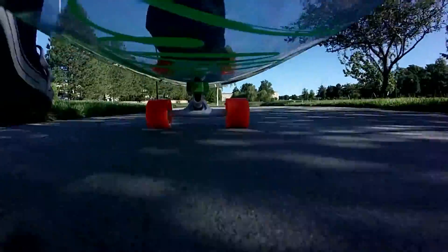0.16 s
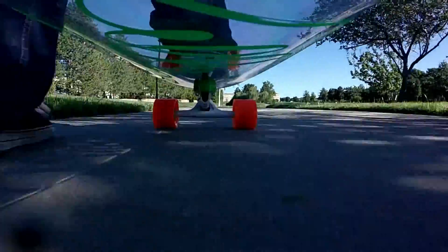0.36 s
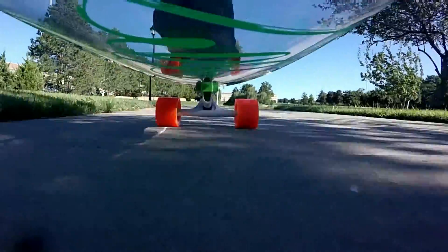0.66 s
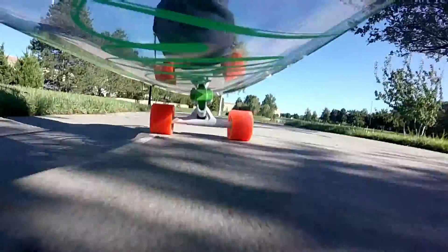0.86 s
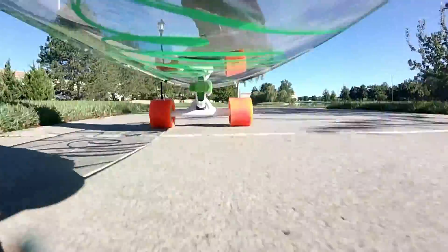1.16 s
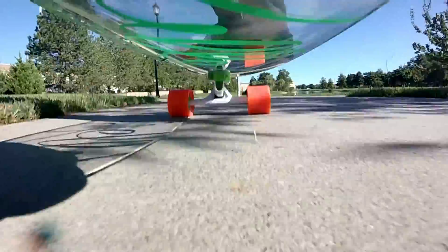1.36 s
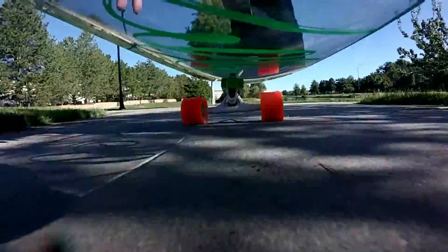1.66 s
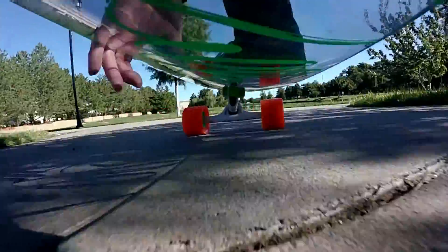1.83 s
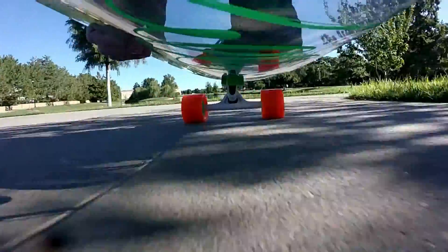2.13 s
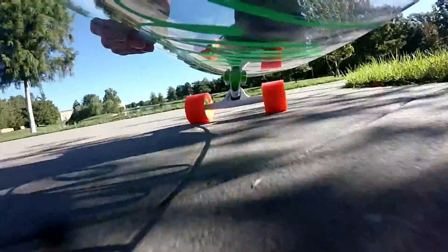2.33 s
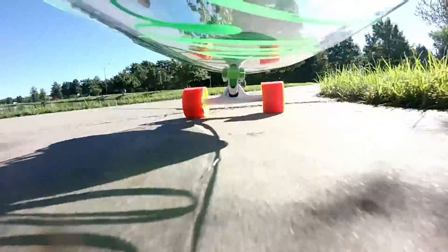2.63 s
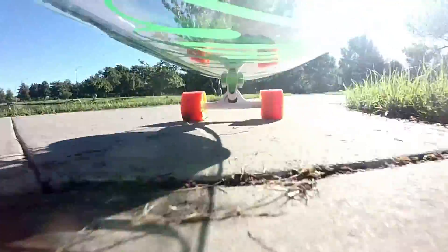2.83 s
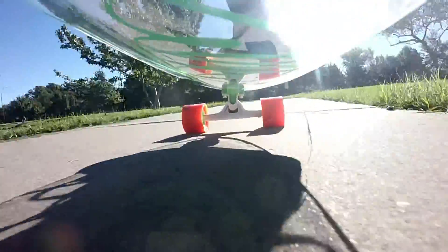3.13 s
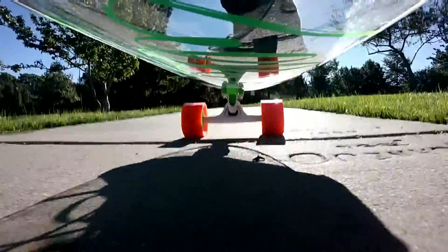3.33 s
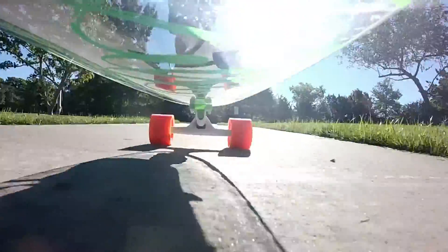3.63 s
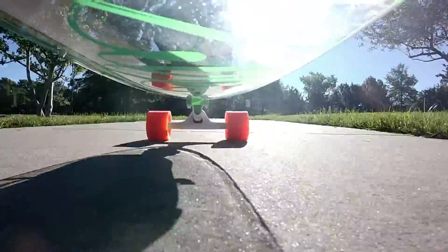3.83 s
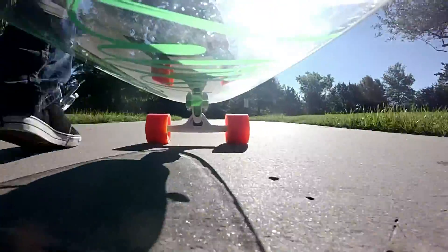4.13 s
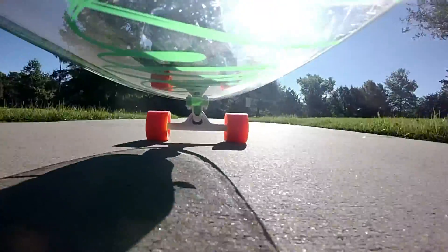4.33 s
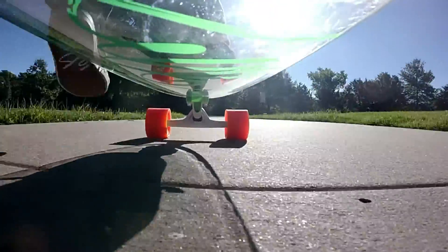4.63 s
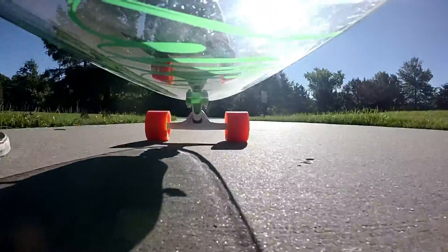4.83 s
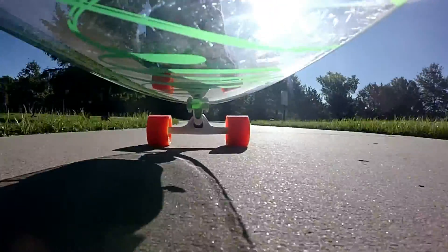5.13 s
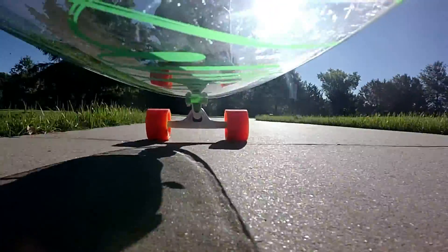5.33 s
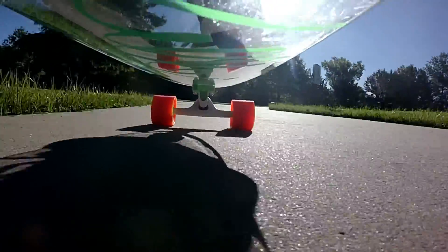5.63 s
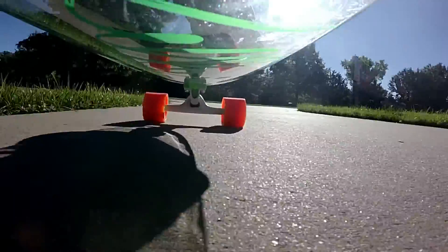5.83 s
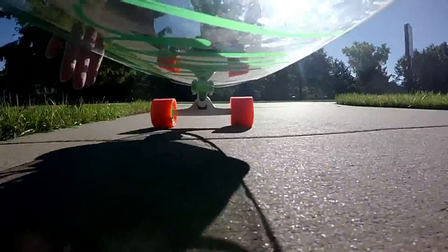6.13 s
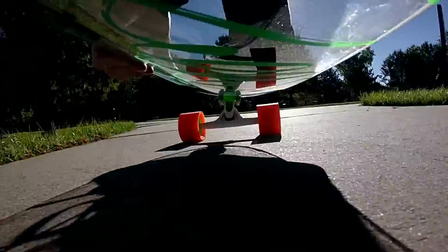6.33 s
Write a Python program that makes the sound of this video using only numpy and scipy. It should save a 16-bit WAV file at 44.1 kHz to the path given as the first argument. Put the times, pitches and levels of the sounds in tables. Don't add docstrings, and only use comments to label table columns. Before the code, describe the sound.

A close, dry, single-channel microphone hangs under a skateboard deck in open air. It begins straight on a joint with a hard bang, then steady rumbling and fine grit hiss continue. Pairs of hard clacks return about every half second, front axle then rear, while loose plastic ticks and rattles rapidly around them. Tiny rubber squeaks come near one second and past the middle; more knocks arrive just before the end.

```python
import sys
import numpy as np
from scipy import signal
from scipy.fft import rfft, irfft, next_fast_len
from scipy.io import wavfile
from scipy.ndimage import map_coordinates

SR = 44100
rng = np.random.default_rng(int(sys.argv[2]) if len(sys.argv) > 2 else 0)


def linear_from_db(decibels):
    return 10 ** (np.asarray(decibels, float) / 20)


def wrap_up_sound(samples):
    columns = np.atleast_2d(samples).T
    tamed = np.clip(columns, -1, 1)
    steps = np.round(tamed * 32767).astype(np.int16)
    wavfile.write(sys.argv[1], SR, steps)


N = 285327


def unit(x):
    return x / np.sqrt(np.mean(x ** 2) + 1e-20)


def curves(rows):
    s, *columns = np.transpose(rows)
    return [np.interp(np.arange(N) / SR, s, column) for column in columns]


def wobble(rate):
    knots = rng.standard_normal(int(N * rate / SR) + 4)
    return map_coordinates(knots, [np.arange(N) * rate / SR])


def filtered(x, response):
    m = next_fast_len(N + SR // 2)
    return irfft(rfft(x, m) * response(np.fft.rfftfreq(m, 1 / SR)), m)[:N]


def colour(points):
    f, db = np.transpose(points)
    return lambda hz: linear_from_db(np.interp(np.log(hz + 1), np.log(f), db))


def resonance(f, centre, width, db):
    return linear_from_db(db) * 1j * f * width / (centre ** 2 - f * f + 1j * f * width)


def body(modes):
    return lambda f: sum((-1) ** k * resonance(f, *mode) for k, mode in enumerate(modes))


def place(times, sounds):
    at = np.round(times * SR).astype(int)[:, None] + np.arange(sounds.shape[1])
    return np.bincount(at.ravel(), sounds.ravel(), N + SR)[:N]


# (time [s], peak level [dB], ring frequency [Hz], brightness [dB])
FRONT_KNOCKS = [(0.0, -7.5, 2970, -8), (0.0024, 6.5, 3250, -25), (0.0094, 2, 1420, -9),
                (0.022, 0, 1520, -18), (0.6574, 5.5, 3970, -13), (0.6747, 2, 3000, -16.5),
                (1.2047, -6.5, 3170, -22), (1.7339, -5.5, 1620, -32), (1.7505, -4, 4030, -26),
                (1.7544, -5, 3000, -36), (2.7652, 4, 3060, -22), (2.783, 3, 3770, -16),
                (2.7991, -8.5, 1980, -21), (3.371, 7, 5130, -15), (3.3908, -1, 1453, -15),
                (3.4078, -4.5, 2750, -24), (4.026, -6, 2050, -44), (4.0374, -2, 2960, -34),
                (4.0441, 4, 3170, -13), (4.0522, -9, 1924, -32), (4.584, -4, 1860, -38),
                (4.594, -1.5, 2770, -2), (4.6013, -1, 2840, -31), (4.612, -1, 3000, -25),
                (5.006, 2.5, 2960, -17), (5.014, 2, 1580, -16), (5.0214, 1.5, 3020, -35),
                (5.7638, -2, 1800, -20.5), (5.7672, -4, 3020, -44), (5.7827, -6, 3300, -37)]
# (time [s], peak level [dB], ring frequency [Hz], brightness [dB])
REAR_KNOCKS = [(0.2536, -2.5, 5550, -17), (0.258, -2, 1350, -7), (0.2666, -1.5, 3120, -27),
               (0.2843, -5.5, 3850, -19), (0.289, 0, 1900, -34), (0.867, 2, 3380, -13.5),
               (0.8739, 0.5, 4020, -9.5), (0.879, -5, 1670, -22), (0.8932, -3, 3330, -32),
               (1.3835, -4, 1700, -12), (1.399, 0.5, 2730, -20), (1.934, 1, 3000, -18),
               (1.949, -2.5, 5300, -11), (1.9528, 1.5, 2720, -16), (1.9675, -2, 2820, -18),
               (2.4407, -1.5, 3000, -53), (2.4695, -3.5, 1620, -26), (2.962, -4, 1640, -7),
               (2.9681, 2, 1780, -23), (2.9767, -6, 3340, -11), (2.9831, -0.5, 1520, -10.5),
               (3.554, -8, 1410, -14), (3.5604, 6.5, 2040, -22.5), (4.2439, 2, 2780, -15),
               (4.2507, 0, 2850, -30), (4.7711, 0.5, 2900, -13), (4.779, -1.5, 3900, -11),
               (5.1677, 4, 2963, -31), (5.531, -0.5, 3520, -3.5), (5.9208, 3.5, 5300, -14)]
# (time [s], peak level [dB], brightness [dB])
MORE_KNOCKS = [(0.277, -5, -32), (0.47, -25.5, -9.5), (0.5806, -8, -49), (0.712, -9, -48),
               (0.8625, -9, -18), (0.8974, -7.5, -18), (0.911, -6.5, -28), (1.2429, -11.5, -34),
               (1.587, -11.5, -54), (2.9883, -10, -30), (3.0146, -11, -22), (3.3598, -10.5, -37),
               (3.388, -4.5, -19), (3.548, -8, -69), (4.0558, -4, -26), (4.1783, -22, -26),
               (4.2737, -10, -27), (4.7854, -5.5, -41), (5.029, -7.5, -42), (5.1764, -5.5, -18),
               (5.1828, -9.5, -36), (5.3635, -12, -12), (5.388, -8.5, -19), (5.3988, -8.5, -28),
               (5.435, -12.5, -43), (5.54, -9.5, -33), (5.9172, -5.5, -5), (6.1701, -3.5, -45),
               (6.31, -2, -18), (6.3144, 1.5, -8.5)]


def knocks():
    s, db, bright_db = np.transpose(MORE_KNOCKS)
    hz = 2900 * np.exp(0.15 * rng.standard_normal(len(s)))
    more = np.transpose([s, db, hz, bright_db])
    return np.concatenate([FRONT_KNOCKS, REAR_KNOCKS, more])


# (frequency [Hz], width [Hz], level [dB])
HOUSING_MODES = [(740, 186, 12), (1780, 305, 7), (3000, 2570, 3), (5550, 2250, -2), (8200, 400, -41)]


def mount_rattle():
    s, db, hz, bright_db = np.transpose(knocks())[:, :, None]
    start = s[:, 0]
    t = np.arange(SR // 40) / SR
    noise = rng.standard_normal((len(s), 3, len(t)))
    noise[:, :2, 0] = -2.5

    ring = np.sin(2 * np.pi * hz * t) * linear_from_db(-60 * t / 0.0067) * (1 - np.exp(-t / 0.00039))
    ring = place(start, linear_from_db(db - 1.0) * ring)

    buzz = place(start, linear_from_db(db + 0.2 * bright_db + 2) * noise[:, 0] * linear_from_db(-60 * t / 0.0039))
    tail = place(start, linear_from_db(db - 10.0 - 60 * t / 0.024) * noise[:, 2, ::-1])
    tail = filtered(tail, lambda f: 1 / (1 + 1j * f / 5000) ** 2)
    lead_s = 0.006
    scrape = linear_from_db(db - 36.0 + 60 * (t - lead_s) / 0.095) * (t < lead_s) * noise[:, 2]
    scrape = place(np.maximum(start - lead_s, 0), scrape)
    housing = filtered(buzz + tail + scrape, body(HOUSING_MODES))

    thud = place(start, -linear_from_db(db - 8.0 - 60 * t / 0.014) * np.cos(2 * np.pi * 350 * t))
    plastic = filtered(ring + housing + thud, lambda f: 1 / (1 + 1j * f / 6500 - (f / 6500) ** 2))

    tick = place(start, linear_from_db(db + bright_db + 4.5) * noise[:, 1] * linear_from_db(-60 * t / 0.0062))
    tick = filtered(tick, body([(6300, 1150, 4.5), (10940, 760, -0.5), (14400, 6000, -5.5)]))
    return plastic + tick


# (time [s], peak level [dB], deck swing frequency [Hz], crunch level [dB])
EDGES = [(0.0, -10, 119, 4.5), (0.255, -10, 211, -4), (0.272, -7, 137, -8), (0.58, -9.5, 343, -8),
         (0.656, -5.5, 193, -13), (0.863, -6.5, 133, -16), (1.201, -12, 246, -6), (1.381, -11.5, 184, 6.5),
         (1.394, -17, 165, 2), (1.751, -13, 110.8, 1), (1.926, -4, 147, -6), (2.425, -12.5, 196.8, -18),
         (2.438, -16, 210, -19), (2.779, -5.5, 99, -12), (2.959, -3.5, 171, -37), (2.973, -11.5, 207, -2),
         (3.383, -9.5, 198, 8.5), (3.555, -8, 176, 2), (4.035, -6.5, 156, -7), (4.238, -16, 165, 10.5),
         (4.268, -10.5, 210, -4.5), (4.582, -6.5, 188, 1.5), (4.774, -10.5, 216, -5), (5.011, -9, 236, -2),
         (5.17, -13, 206, 5), (5.394, -7, 229, -6.5), (5.529, -7.5, 267, -2), (5.764, -12, 228, 3),
         (5.913, -5.5, 122, -33), (6.16, -13.5, 200.7, 2), (6.306, -7, 188, -13)]


def jolts():
    s, db, hz, crunch_db = np.transpose(EDGES)[:, :, None]
    t = np.arange(SR // 16) / SR
    noise = rng.standard_normal((len(s), 2, len(t)))
    start = np.maximum(s[:, 0] - 0.003, 0)
    load = (t / 0.0073) ** 2 * np.exp(2 - 2 * t / 0.0069)
    swing = place(start, -linear_from_db(db - 1.0) * load * np.sin(2 * np.pi * hz * t))
    shake = place(start, linear_from_db(db + 18.0) * load * noise[:, 0])
    crunch = place(start, linear_from_db(db + crunch_db + 7.5) * load * noise[:, 1])
    deck_modes = body([(110, 90, 0), (300, 200, -3)])
    tyre_modes = body([(450, 350, -1), (850, 700, 0)])
    shake = filtered(shake, lambda f: deck_modes(f) / (1 + 1j * f / 700))
    crunch = filtered(crunch, lambda f: tyre_modes(f) / (1 + 1j * f / 1800) ** 2)
    return swing + shake + crunch


def jolt_dip_db():
    s, db = np.transpose(EDGES)[:2]
    u = np.arange(SR // 2) / SR / 0.093
    dip_db = -9
    return dip_db * place(s, linear_from_db(db)[:, None] * u ** 2 * np.exp(2 - 2 * u))


# (time [s], peak level [dB])
BODY_TAPS = [(0.028, -20), (0.1163, -38), (0.1265, -18.5), (0.131, -23.5), (0.1429, -25), (0.152, -32),
             (0.1604, -23), (0.17, -28), (0.1786, -27), (0.187, -27), (0.22, -25.5), (0.2362, -21.5),
             (0.262, -18), (0.3032, -12.5), (0.3182, -19), (0.334, -18.5), (0.349, -23), (0.363, -19),
             (0.3784, -17.5), (0.381, -24), (0.5183, -25.5), (0.5848, -20), (0.5974, -19), (0.6064, -23),
             (0.616, -22), (0.6217, -20), (0.6348, -20), (0.6427, -17), (0.6811, -18), (0.689, -18),
             (0.6935, -16), (0.6994, -24.5), (0.7153, -13), (0.7284, -20), (0.7437, -21), (0.748, -28),
             (0.7843, -35), (0.7989, -29), (0.8036, -19.5), (0.8094, -21), (0.8124, -29), (0.825, -15.5),
             (0.8288, -23), (0.8342, -31), (0.843, -16.5), (0.8848, -15), (0.9445, -28), (0.9493, -18),
             (0.9741, -21.5), (1.014, -21), (1.0185, -30), (1.1845, -28), (1.2017, -19), (1.2224, -14),
             (1.238, -18), (1.2916, -22),
             (1.296, -32), (1.304, -30), (1.3168, -17.5), (1.3213, -24), (1.3264, -34), (1.3322, -15.5),
            (1.3366, -28), (1.3433, -18), (1.4033, -27), (1.4124, -20), (1.4157, -19.5), (1.4325, -28),
            (1.446, -23), (1.466, -23), (1.4874, -20.5), (1.5356, -21), (1.5396, -22), (1.5533, -24),
            (1.595, -26), (1.7704, -15), (1.786, -20), (1.7892, -22), (1.8037, -16), (1.808, -16.5),
            (1.821, -30), (1.9307, -19), (1.9376, -28), (1.9444, -16), (1.9709, -19), (1.9802, -22.5),
            (1.9974, -26), (2.0179, -33), (2.2963, -17), (2.348, -29), (2.3563, -31), (2.3597, -25),
            (2.398, -27), (2.4263, -12.5), (2.4466, -26), (2.453, -36), (2.4754, -26), (2.4838, -24),
            (2.5144, -24), (2.6569, -23), (2.6923, -30), (2.697, -27), (2.707, -25), (2.7105, -25),
            (2.7719, -23), (2.7755, -23), (2.803, -14.5), (2.8065, -27), (2.817, -38), (2.9393, -19),
            (2.9564, -19), (3.0429, -28),
             (3.0593, -30), (3.1406, -30), (3.1532, -24), (3.1693, -28), (3.185, -30), (3.198, -25.5),
             (3.2264, -25), (3.2442, -26), (3.2483, -26), (3.2628, -26), (3.2772, -27), (3.2807, -27),
             (3.297, -25), (3.3125, -19), (3.3272, -21), (3.332, -23), (3.3945, -30), (3.411, -31),
             (3.444, -26), (3.501, -28), (3.5671, -16.5), (3.5745, -13), (3.605, -26.5), (3.6268, -31),
             (3.9374, -32), (3.9716, -30.5), (3.9803, -22.5), (4.067, -25.5), (4.0934, -37),
             (4.1836, -23.5), (4.1952, -27), (4.2349, -26), (4.27, -20), (4.2797, -23), (4.2844, -16),
             (4.2897, -20), (4.2958, -13.5), (4.3134, -23), (4.3235, -27), (4.3381, -32), (4.3624, -32),
             (4.378, -23.5), (4.395, -31), (4.4156, -38), (4.4244, -27), (4.433, -33), (4.456, -34),
             (4.5178, -19), (4.5267, -32), (4.5337, -30), (4.5512, -25), (4.5707, -16), (4.617, -17),
             (4.6278, -30), (4.6685, -26),
             (4.6717, -34), (4.6809, -26), (4.709, -30), (4.7187, -26), (4.7596, -16), (4.7664, -18),
             (4.7958, -25), (4.8426, -24), (4.998, -27), (5.0465, -21), (5.0615, -21.5), (5.0709, -26),
             (5.078, -27), (5.0957, -22), (5.151, -33), (5.1568, -34), (5.1639, -19), (5.1732, -37),
             (5.225, -26), (5.23, -26), (5.2542, -32), (5.2698, -22.5), (5.2729, -27), (5.2779, -33),
             (5.2843, -29), (5.293, -30), (5.298, -22), (5.3461, -20), (5.3961, -20), (5.5234, -27),
             (5.5704, -20.5), (5.5855, -23), (5.5892, -27), (5.6704, -35), (5.6854, -31), (5.7218, -25),
             (5.725, -29), (5.7493, -25), (5.7792, -17), (5.8784, -22), (5.8941, -25), (5.933, -29),
             (5.9363, -19), (5.9402, -33), (5.9936, -27), (6.1778, -30), (6.1837, -20), (6.2833, -25),
             (6.307, -21), (6.3273, -26), (6.3326, -36), (6.3444, -25), (6.3478, -29), (6.383, -35),
             (6.3976, -32)]
# (time [s], peak level [dB], edge over body [dB])
EDGE_TAPS = [(0.2714, -16, -1), (0.388, -33, -1), (0.6662, -21, -3), (1.2125, -25, 1), (1.372, -21, -2),
             (1.3814, -13.5, -4), (1.3859, -8.5, -3), (1.3924, -24, 6), (1.405, -20, -5), (1.7396, -27, 0),
             (1.7468, -24, 8), (1.928, -24, 15), (2.3226, -29, 9), (2.397, -27, 5), (2.8804, -44, 8),
             (2.8845, -33, 6), (3.089, -49, 13), (3.5699, -28, 2), (3.5787, -21.5, -4), (4.035, -25, -1),
             (4.2405, -16, -11), (4.2589, -17, 0), (5.3256, -20, -6), (5.3559, -21.5, -4),
             (5.5288, -15, -11), (5.9112, -39, 10), (6.113, -40, 11), (6.1513, -23, -1), (6.322, -25, 3),
             (6.3292, -25, -5)]


def arm_taps():
    flat_s, flat_db = np.transpose(np.array(BODY_TAPS))
    snap_s, snap_db, snap_edge_db = np.transpose(EDGE_TAPS)
    flat_edge_db = -9.5 + 0.41 * flat_db + 4.5 * rng.standard_normal(len(flat_s))
    return np.r_[flat_s, snap_s], np.r_[flat_db, snap_db], np.r_[flat_edge_db, snap_edge_db]


def roughness(tap_s):
    t = np.arange(-SR // 8, SR // 8) / SR
    reach = np.exp(-(t / 0.019) ** 2)
    taps = place(tap_s, np.ones((len(tap_s), 1)))
    return np.tanh(0.27 * signal.fftconvolve(taps, reach, "same"))


# (frequency [Hz], width [Hz], level [dB])
ARM_MODES = [(2060, 950, 3.5), (3640, 1300, -1)]
# (frequency [Hz], width [Hz], level [dB])
ARM_EDGE_MODES = [(5300, 2300, 0), (7760, 630, -4)]


def arm_chatter(s, db, edge_db, rough):
    chance = rng.random((len(s), 2))
    rebound_s = s + 0.0044 + 0.0042 * chance[:, 0]
    rebound_db = db - 15 - 9 * chance[:, 1]

    faint_s = np.sort(rng.uniform(0, N / SR, 700))
    at = (faint_s * SR).astype(int)
    scatter_db = rng.uniform(-9, 5, (2, len(faint_s)))
    grit_db = curves(ROAD)[-1]
    faint_db = grit_db[at] + 9 + scatter_db[0] + 6 * rough[at]

    s = np.concatenate([s, rebound_s, faint_s])
    db = np.concatenate([db, rebound_db, faint_db])
    edge_db = np.concatenate([edge_db, edge_db, scatter_db[1] - 21])

    t = np.arange(SR // 100) / SR
    tap = linear_from_db(-19.5 - 60 * t / 0.012) * rng.standard_normal((len(s), len(t)))
    tap[:, 0] = 1
    edge = place(s, linear_from_db(db + edge_db + 15.5)[:, None] * tap)
    taps = place(s, linear_from_db(db + 20)[:, None] * tap)

    def arm_response(f):
        soft = 1j * f / (1200 + 1j * f) / (1 + 1.2j * f / 4500 - (f / 4500) ** 2) ** 2
        thud = body([(326, 136, 18.5), (810, 780, 0.5)])(f)
        return body(ARM_MODES)(f) * soft - thud / (1 + 1j * f / 1100)

    def edge_response(f):
        hard = 1j * f / (3500 + 1j * f) / (1 + 1j * f / 8600 - (f / 8600) ** 2) ** 3
        return body(ARM_EDGE_MODES)(f) * hard

    return filtered(edge, edge_response) + filtered(taps, arm_response)


# (time [s], load level [dB], grit level [dB])
ROAD = [(0.0, -29, -67.5), (0.21, -26, -60), (0.85, -21, -55.5), (1.08, -25.5, -57), (2.14, -25.5, -52.5),
        (2.38, -23, -50.5), (2.76, -24.5, -48), (2.99, -23, -51.5), (3.22, -29, -54), (3.42, -24.5, -55),
        (3.66, -30, -62), (4.23, -26, -60), (4.42, -23, -55.5), (4.79, -26.5, -57.5), (5.32, -23, -52),
        (5.64, -28.5, -56), (6.18, -24, -53.5), (6.47, -24.5, -50)]


def rolling(rough):
    load_db, grit_db = curves(ROAD)
    dip_after_db = jolt_dip_db()
    deck_db = load_db + 3.5 + dip_after_db
    hiss_db = grit_db + 12.0 + 0.95 * dip_after_db
    load_swing_db = deck_db - deck_db.mean()
    grit_swing_db = hiss_db - hiss_db.mean()
    tyre_db = -35 + 0.92 * load_swing_db + 0.071 * grit_swing_db + 7 * (rough - 0.5)
    patch_db = 2.0 * wobble(7.8)
    deck = linear_from_db(deck_db) * deck_rumble(patch_db) + swells()
    tyres = linear_from_db(tyre_db) * tyre_roar(patch_db)
    bearings = linear_from_db(hiss_db) * bearing_hiss(patch_db, grit_db)
    return deck + tyres + bearings


def grit(per_s, spread_db, smooth):
    hit = rng.random(N) < per_s / SR
    size = np.minimum(rng.exponential(1, N), 3)
    kicks = hit * rng.standard_normal(N) * linear_from_db(spread_db * size)
    return unit(kicks) + smooth * rng.standard_normal(N)


# (frequency [Hz], width [Hz], level [dB])
DECK_MODES = [(75.5, 140, -12.5), (137, 85, -3), (216, 88.6, -3), (313, 131, -8.5)]
# (time [s], frequency [Hz])
MAIN_MODE = [(0, 238.1), (.42, 312.6), (.53, 316.2), (.6, 223.2), (.7, 204.8), (1.05, 219.2), (3.8, 230.2),
             (4.15, 262.5), (4.45, 234.5), (4.9, 250), (5.1, 223.7), (6.47, 217.4)]


def deck_rumble(patch_db):
    stones = linear_from_db(patch_db) * grit(900, 2.0, smooth=0.83)
    board = filtered(stones, lambda f: body(DECK_MODES)(f) / (1 + 1j * f / 900) ** 2)
    hum_hz, = curves(MAIN_MODE)
    phase = 2 * np.pi * np.cumsum(hum_hz) / SR
    hum = wobble(55) * np.cos(phase) + wobble(55) * np.sin(phase)
    return linear_from_db(-2.5) * unit(board) + linear_from_db(-7.0) * unit(hum)


# (time [s], width [s], level [dB], frequency [Hz])
RIPPLES = [(0.134, 0.0031, -14, 250), (0.192, 0.0053, -17, 273), (0.221, 0.0036, -19, 237),
           (.5, .018, -22, 344), (0.641, .01, -9, 212), (0.845, 0.003, -18, 257.5),
           (0.915, 0.0025, -6.5, 300), (0.965, 0.004, -9, 240), (1.021, 0.006, -8, 208),
           (1.064, 0.013, -8.5, 232), (1.345, 0.0015, -8, 212), (1.428, 0.0039, -14, 205.4),
           (1.47, 0.0049, -13, 233), (1.511, 0.012, -16, 230), (1.578, 0.0041, -13, 230),
           (1.608, 0.0098, -8, 225), (1.632, 0.0057, -16, 216), (1.788, 0.0043, -12, 220),
           (2.259, 0.0038, -21, 213), (2.295, 0.009, -16.5, 258), (2.324, 0.0063, -15.5, 231),
           (2.534, 0.015, -14.5, 260), (2.635, 0.0066, -21, 241), (2.698, 0.0045, -13, 226),
           (2.803, 0.0028, -22, 263), (3.279, 0.0076, -15, 223), (3.372, 0.0043, -12, 305),
           (3.555, 0.0037, -7.5, 370), (3.89, 0.0052, -17, 252), (4.243, 0.0044, -5.5, 141),
           (4.543, 0.0077, -21, 243), (5.129, 0.0049, -19, 219), (5.324, 0.005, -16, 236.3),
           (5.354, 0.0031, -14, 236), (5.418, 0.0087, -9.5, 230), (5.468, 0.0083, -13, 220),
           (5.684, 0.01, -15, 234), (5.788, 0.01, -10.5, 208.2), (5.857, 0.005, -13, 208.3),
           (6.117, 0.0073, -12.5, 216)]


def swells():
    s, width, db, hz = np.transpose(RIPPLES)[:, :, None]
    t = np.arange(-SR // 16, SR // 16) / SR
    phase = 2 * np.pi * (hz * t + rng.random((len(s), 1)))
    swell_db = db - 3.5 - 6.6 * (t / (1.33 * width)) ** 2
    return place(s[:, 0] + t[0], linear_from_db(swell_db) * np.cos(phase))


# (frequency [Hz], level per Hz [dB])
TYRE_COLOUR = [(250, -36), (450, 4.5), (800, -5.5), (1300, -18.5), (2000, -14.5), (4000, -53)]


def tyre_roar(patch_db):
    stones = grit(900, 2.0, smooth=0.9)
    return unit(filtered(linear_from_db(patch_db + 4.0 * wobble(60)) * stones, colour(TYRE_COLOUR)))


# (frequency [Hz], level per Hz [dB])
HISS_COLOUR = [(900, -5), (1500, -8), (2100, -16.5), (2760, -20.5), (3600, -12.5), (4500, -17.5),
               (5250, -11.5), (5800, -20.5), (7500, -24), (9100, -37), (11000, -20.5), (12700, -40),
               (15000, -61)]


def bearing_hiss(patch_db, grit_db):
    stones = grit(1500, 1.8, smooth=1.2)
    hiss = filtered(linear_from_db(patch_db + 2.6 * wobble(78)) * stones, colour(HISS_COLOUR))
    treble = filtered(hiss, lambda hz: hz > 6500)
    hiss += (linear_from_db(0.21 * (grit_db - grit_db.mean())) - 1) * treble
    return unit(hiss)


# (time [s], length [s], frequency [Hz], level [dB])
BUSHING_SLIPS = [
    (1.018, 0.081, 4120, -41),
    (3.672, 0.067, 1900, -43),
]


def squeaks():
    s, length, hz, db = np.transpose(BUSHING_SLIPS)[:, :, None]
    t = np.arange(SR // 14) / SR
    drift = 0.24 * np.cumsum(rng.standard_normal((len(s), len(t))), axis=1)
    swell = np.sin(np.pi * np.clip(t / length, 0, 1))
    whistle = np.sin(2 * np.pi * hz * t * (1 + 0.83 * t) + drift)
    return place(s[:, 0], linear_from_db(db) * swell * whistle)


def scene():
    tap_s, tap_db, edge_db = arm_taps()
    rough = roughness(tap_s)
    mount = mount_rattle() + arm_chatter(tap_s, tap_db, edge_db, rough)
    board = jolts() + rolling(rough) + squeaks()
    return (mount + board)[None]


def low_pass(x):
    return signal.sosfilt(signal.butter(12, 16360, fs=SR, output="sos"), x)


def record(dry):
    clipped = dry[0] / (1 + np.abs(dry[0]) ** 8) ** (1 / 8)
    band = colour([(25, -4.0), (70, 1.5), (12500, -2.5), (16000, -21), (16600, -60)])
    dulled = filtered(clipped, band)
    return low_pass(dulled[None])


dry = scene()
out = record(dry)
wrap_up_sound(out)
```